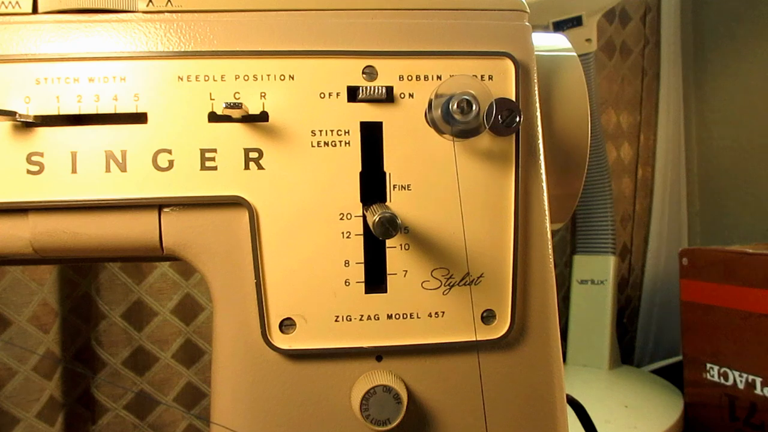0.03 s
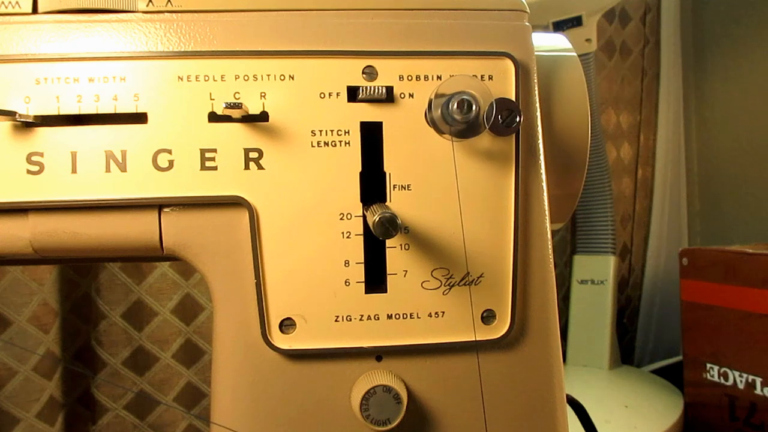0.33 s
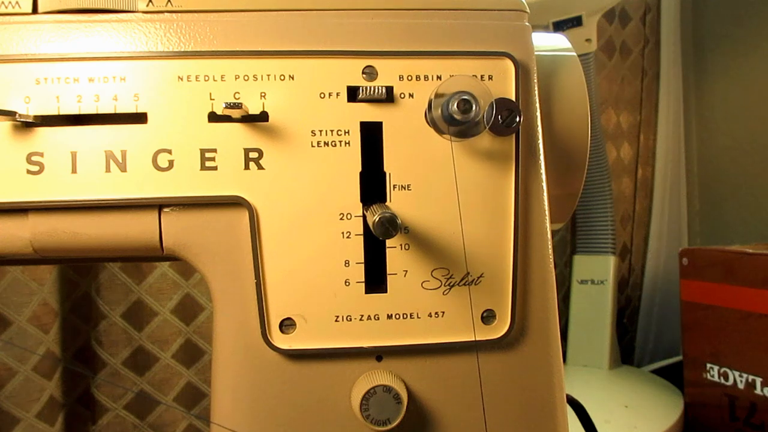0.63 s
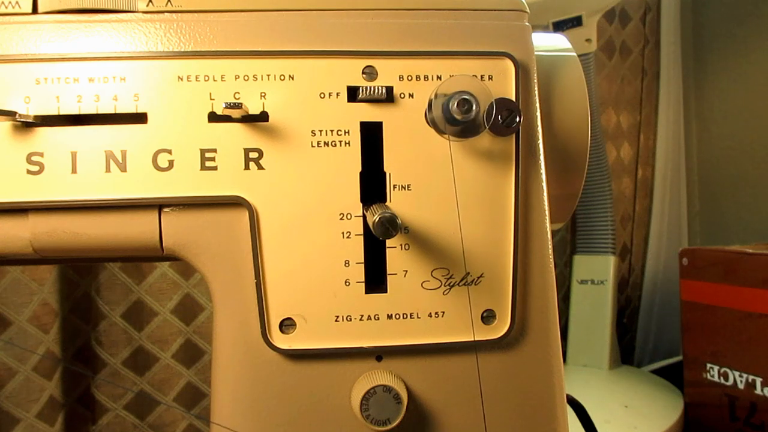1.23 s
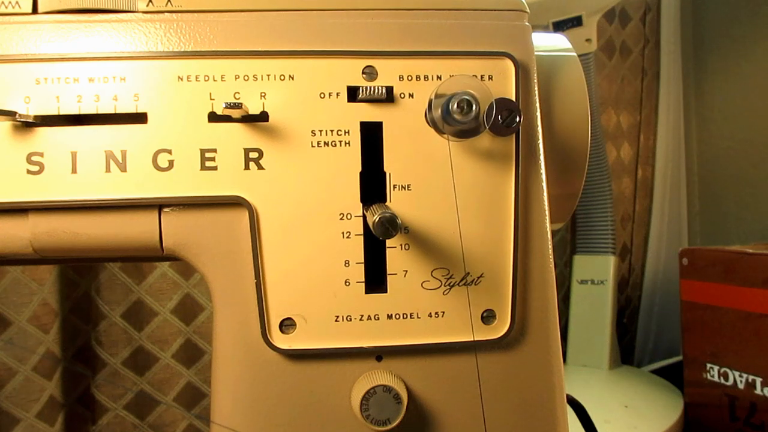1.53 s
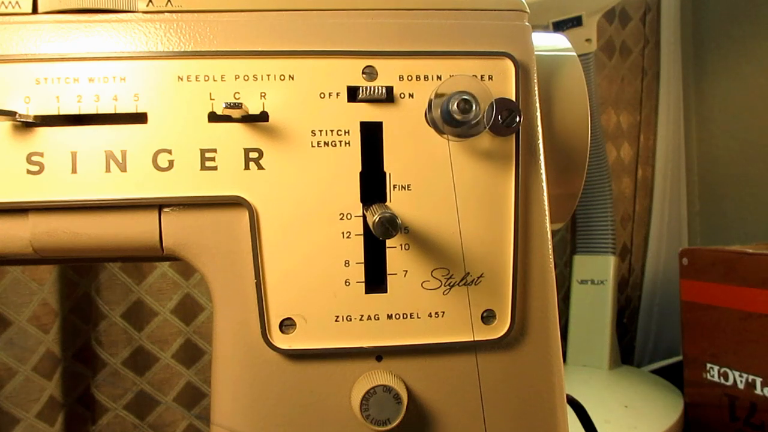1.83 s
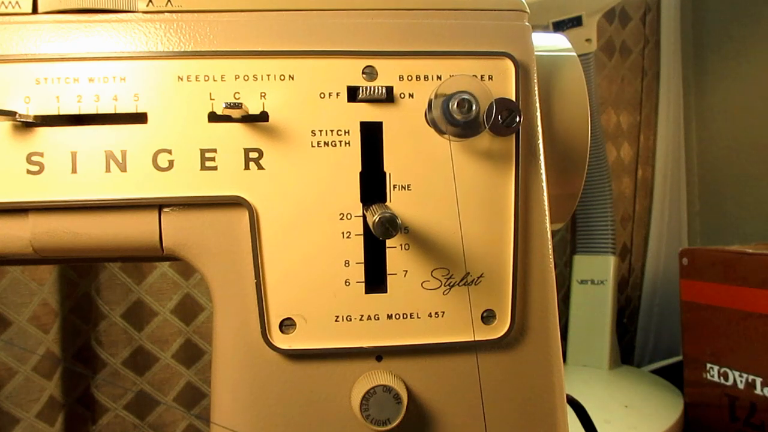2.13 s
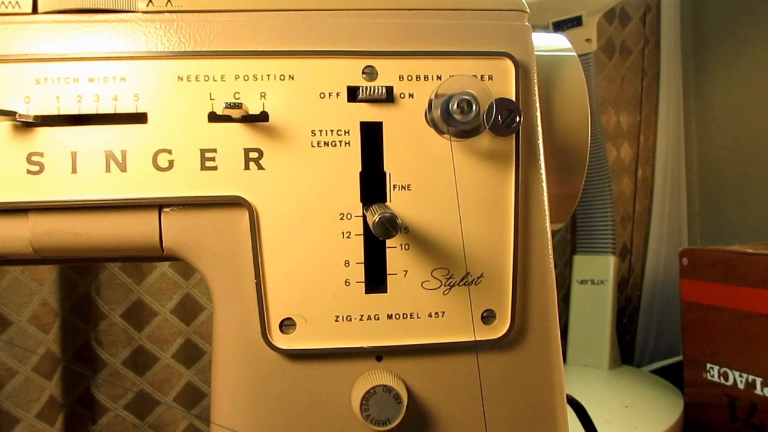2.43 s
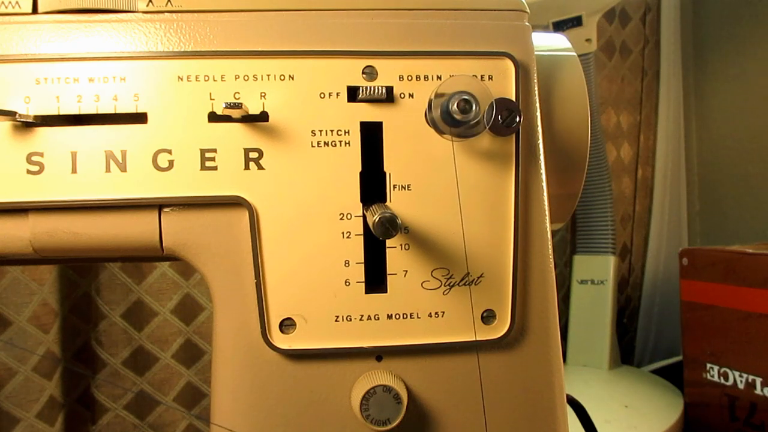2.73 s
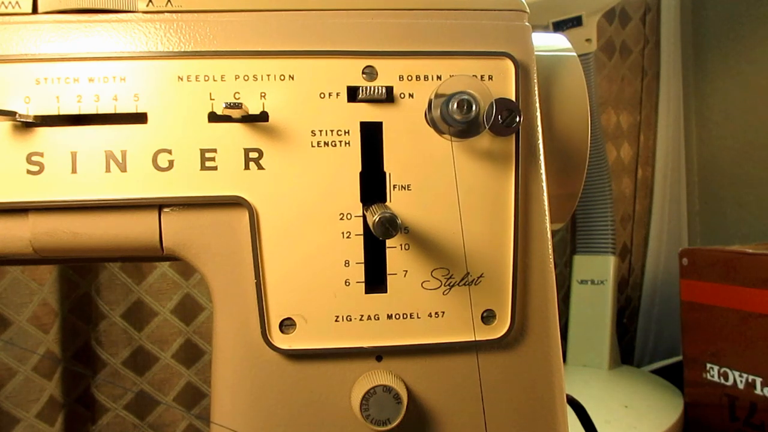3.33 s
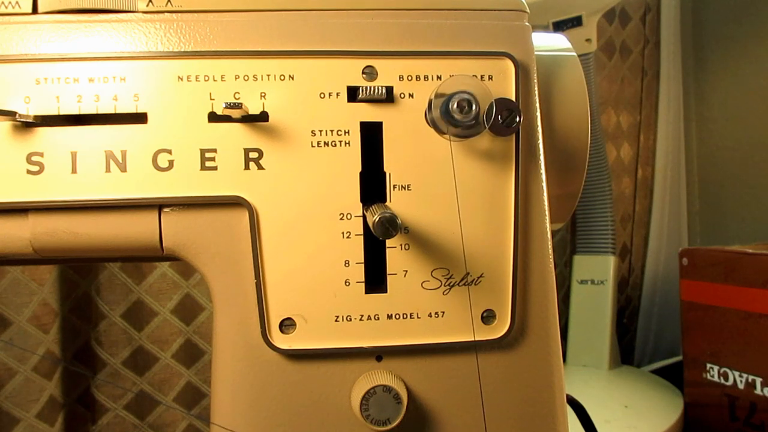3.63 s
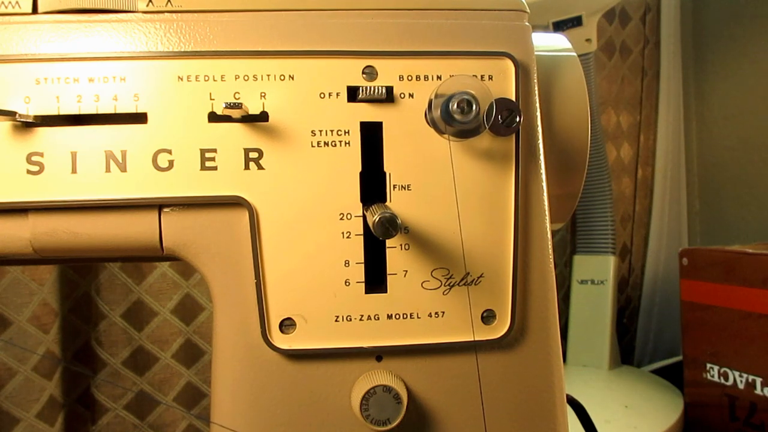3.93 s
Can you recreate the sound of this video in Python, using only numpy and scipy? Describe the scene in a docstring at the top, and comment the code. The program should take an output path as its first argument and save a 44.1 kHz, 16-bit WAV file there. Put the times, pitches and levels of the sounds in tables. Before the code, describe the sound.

A sewing machine winds a bobbin close by in a quiet room. Its motor whirs with a high buzz, a clear, slightly rising tone and rapid light knocks. One sharp snap comes near the middle as it runs on.

```python
"""A sewing machine winds a bobbin in a quiet room, slowly gaining speed.
Its motor brushes ring on the commutator and the winder sings one clear tone on top.
The belt drive knocks about eight times a second over a bed of motor whine, casing hum and
bearing and fan whir. One sharp snap makes the gain control duck, then ease back up."""
import sys
import numpy as np
from scipy import signal
from scipy.fft import rfft, irfft
from scipy.io import wavfile

SR = 44100
rng = np.random.default_rng(int(sys.argv[2]) if len(sys.argv) > 2 else 0)


def unload_audio(sound):
    """Save the sound as a 16-bit wav file, at the path given as the first command line argument."""
    columns = np.transpose(np.atleast_2d(sound))
    # keep every value between -1 and 1, then stretch to whole-number steps
    steps = np.round(np.clip(columns, -1, 1) * 32767)
    wavfile.write(sys.argv[1], SR, steps.astype(np.int16))


N = 176400
T = np.arange(N) / SR

# Motor run-up: (time [s], shaft speed [turns/s])
SHAFT_SPEED = [(0, 36.3), (.5, 36.8), (1, 37.5), (1.5, 38), (2.1, 38.4), (2.7, 38.55), (3.05, 38.85),
               (3.5, 39.05), (4, 39.4)]
# Peaks and notches of the casing: (frequency [Hz], width [Hz], boost [dB])
CASING_EQ = [(397.4, 13.3, 6.5), (859, 24, -18), (935, 54, 5.5), (1090, 36, 2), (1242, 33, 4),
             (1306, 60, -8), (1370, 24, 6), (1572, 23, 6.5), (1926, 114, 7.5), (2170, 75, -2),
             (2577, 190, 4), (2922, 60, 6.5), (3860, 51, 5.5), (4283, 180, 5.5), (5200, 37, -4),
             (5740, 160, -12), (7920, 54, -6), (8180, 70, -15)]
# Mains hum and two casing drones: (frequency [Hz], half-width [Hz], level [dB])
DRONES = [(120.4, 2.6, -50.5), (134.3, 6.7, -46.5), (781.7, 6, -44)]
# Tone colour of the bearings and fan: (frequency [Hz], relative level [dB])
WHIR_SPECTRUM = [(20, -31), (38, -26), (70, -16), (100, -17), (170, -13.5), (235, 2.5), (330, -2),
                 (460, -2), (700, -6), (1400, -10), (2300, -14), (3500, -11.5), (4500, -11.5), (5300, -6),
                 (6900, -14), (9400, -14.5), (10400, -21.5)]
# Motor whine: (pitch [multiple of shaft speed], mid-run level [dB], swell [dB/s])
MOTOR_PARTIALS = [(1, -69, 1), (7.924, -45, 2.5), (20.25, -48, 2), (21.86, -42.5, -2.5), (43.54, -52, 1.5),
                  (55.35, -49, 1.5), (75.4, -52, -3)]
# Ring of the snapping part: (frequency [Hz], relative level [dB], 60 dB decay time [s])
SNAP_RING = [(1690, -10, 0.012), (1970, -8, 0.014), (2750, -5.5, 0.0089), (3340, -10, 0.0064),
             (4200, -14.5, 0.0076), (6420, -16, .007)]
# Belt rhythm: (time [s], accent [dB], thud relative to the accent [dB])
BELT_KNOCKS = [(0.129, -18.5, -7.5), (0.267, -20.5, -12.5), (0.401, -23, -1.5), (0.537, -27.5, -0.5),
               (0.672, -22.5, -11), (0.808, -21, -3), (0.866, -19.5, -13), (1.023, -16, -9.5),
               (1.076, -15.5, -11.5), (1.208, -18, -10), (1.288, -23, -27), (1.34, -15, -18),
               (1.472, -18.5, -7.5), (1.603, -19, -7), (1.864, -21.5, -5.5), (1.924, -15.5, -13),
               (2.074, -19, -10), (2.127, -14.5, -11.5), (2.256, -16.5, -7), (2.387, -17, -10),
               (2.516, -16.5, -9), (2.646, -17, -12), (2.723, -20.5, -6), (2.775, -26, -22),
               (2.823, -19, -12), (2.903, -17, -6), (2.961, -14.5, -11), (3.11, -21, -15),
               (3.163, -15, -12), (3.29, -15.5, -11), (3.419, -18, -9), (3.496, -20, -11),
               (3.544, -15.5, -11), (3.674, -22, -7), (3.751, -23.5, -21), (3.799, -22, -10),
               (3.849, -18, -14), (3.927, -17.5, -8.5), (3.986, -16, -13)]
# Rise of the winder's tone: (time [s], pitch [Hz], level [dB])
WINDER_GLIDE = [(0, 520, -35), (.3, 524, -33), (.6, 525, -32.5), (1.1, 534, -33.5), (1.7, 539, -32),
                (2.1, 541, -30.5), (2.8, 544.5, -28.5), (3.25, 549.5, -29), (3.5, 548.6, -29),
                (4, 554, -28.5)]
# Brush pressure around the shaft: (rate [cycles/turn], depth [fraction of the mean])
BRUSH_PRESSURE = [(2, 0.16), (3, 0.074), (4, 0.51)]
# Ring of the brush holder: (frequency [Hz], nominal width [Hz], relative level [dB])
HOLDER_MODES = [(4325, 200, -22), (4756, 90, -13.5), (5156, 50, -7.5), (5334, 88, -0.5), (5416, 150, -4),
                (5580, 83, -0.5), (5890, 96, -11.5), (6057, 114, -5), (6153, 63, -4), (6260, 154, -7.5),
                (6550, 180, -22), (7736, 93, -12.5), (8226, 184, -10.5)]
# Swell of the brushes: (time [s], level [dB])
BRUSH_SWELL = [(0, -32), (.4, -31), (.9, -31), (1.45, -29.5), (2, -29.5), (2.6, -28.5), (3.2, -27),
               (4, -27.5)]


def from_db(db):
    """Decibels to gain."""
    return 10 ** (np.asarray(db) / 20)


def unit_rms(x):
    """Scale to unit power."""
    return x / np.sqrt(np.mean(x ** 2) + 1e-20)


def automation(rows):
    """One curve for each column after the time, drawn through every sample."""
    times, *columns = np.transpose(rows)
    return [np.interp(T, times, column) for column in columns]


def noise(gain_at):
    """Unit-power noise coloured by a gain for each frequency."""
    hz = np.maximum(np.fft.rfftfreq(N, 1 / SR), 1e-3)
    return unit_rms(irfft(rfft(rng.standard_normal(N)) * gain_at(hz), N))


def drift(rate_hz):
    """Random modulation of unit power, mostly slower than rate_hz."""
    return noise(lambda hz: 1 / (1 + (hz / rate_hz) ** 2))


def band(x, edges_hz):
    """Gentle band-pass."""
    return signal.sosfilt(signal.butter(2, edges_hz, "band", fs=SR, output="sos"), x)


def resonate(x, hz, width_hz):
    """One resonance with unity gain at its peak."""
    r = np.exp(-np.pi * width_hz / SR)
    feedback = [1, -2 * r * np.cos(2 * np.pi * hz / SR), r * r]
    return signal.lfilter(np.array([1, 0, -1]) * (1 - r * r) / 2, feedback, x + 1e-18)


def clicks(times, sizes):
    """Impulses placed between samples."""
    out, position = np.zeros(N), np.clip(times * SR, 0, N - 2)
    i = position.astype(int)
    np.add.at(out, i, sizes * (1 - position + i))
    np.add.at(out, i + 1, sizes * (position - i))
    return out


def burst(times, db, t60_s, edges_hz):
    """A dense rattle that hits at each time and dies away."""
    decay = from_db(-60 / (t60_s * SR))
    envelope = signal.lfilter([1], [1, -decay], clicks(times, from_db(db)) + 1e-18)
    return envelope * unit_rms(band(rng.standard_normal(N), edges_hz))


def room(x, wet_db=-16.5, t60_s=0.14):
    """A faint, short room tail, different on each side."""
    t = T[:SR // 2]
    tail = rng.standard_normal((2, len(t))) * from_db(-60 * t / t60_s)
    tail /= np.sqrt(np.sum(tail ** 2, axis=1, keepdims=True))
    return from_db(wet_db) * signal.fftconvolve(x[None], tail, axes=1)[:, :N]


def casing(x):
    """The machine's body lifts and scoops narrow bands."""
    for hz, width, boost_db in CASING_EQ:
        x = x + (from_db(boost_db) - 1) * resonate(x, hz, width)
    return x


def hum():
    """Mains hum and casing drones: narrow noise bands that hold their pitch as the motor climbs."""
    return sum(from_db(db) * noise(lambda hz: 1 / (1 + ((hz - centre) / half_width) ** 2))
               for centre, half_width, db in DRONES)


def whir(turns, level_db=-30, side_db=-18.5, throb=0.16, wide_below_hz=70):
    """Bearing and fan noise throbs with the shaft; slightly wide, more so in the bass."""
    points_hz, points_db = np.transpose(WHIR_SPECTRUM)

    def colour(hz):
        return from_db(np.interp(np.log(hz), np.log(points_hz), points_db))

    mid = noise(colour) * (1 + throb * np.sin(2 * np.pi * turns))
    side = noise(lambda hz: colour(hz) * (1 + 1 / (1 + (hz / wide_below_hz) ** 2)))
    return from_db(level_db) * (mid + from_db(side_db) * side * [[1], [-1]])


def motor_whine(turns, flutter_db=1.4, wander_rad=0.16):
    """Wavering tones locked to the shaft; some swell and some fade over the run."""
    whine = np.zeros(N)
    for multiple, db, swell in MOTOR_PARTIALS:
        gain = from_db(db + swell * (T - T.mean()) + flutter_db * drift(4.5))
        phase = 2 * np.pi * multiple * turns + wander_rad * drift(10)
        whine += np.sqrt(2) * gain * np.sin(phase)
    return whine


def snap(crack_at_s=1.7633, contact_at_s=1.7645, low_cut_hz=1400):
    """A snap at the winder: a gritty crack, then a hard contact rings a small, well-damped part."""
    start = np.array([crack_at_s])
    crack = burst(start, db=-12, t60_s=0.013, edges_hz=(1600, 4300))
    grit = burst(start, db=-20, t60_s=0.013, edges_hz=(6000, 8550))
    contact = clicks(np.array([contact_at_s]), 0.95) + 1e-18
    ring = np.zeros(N)
    for k, (hz, db, t60_s) in enumerate(SNAP_RING):
        r, w = from_db(-60 / (t60_s * SR)), 2 * np.pi * hz / SR
        mode = signal.lfilter([0, np.sin(w)], [1, -2 * r * np.cos(w), r * r], contact)
        ring += (-1) ** k * from_db(db) * mode
    low_cut = signal.butter(6, low_cut_hz, "high", fs=SR, output="sos")
    return signal.sosfilt(low_cut, crack + grit + ring)


def belt(rebound_s=0.007, rebound_db=-10, attack_hz=(1100, 4170)):
    """Each belt knock is a hard tick and a short crack with a softer rebound, over a longer thud."""
    times, accent_db, thud_db = np.transpose(BELT_KNOCKS)
    rebounds = times + rebound_s * rng.uniform(0.7, 1.3, len(times))
    ticks = band(clicks(times, from_db(accent_db + 5.5)), attack_hz)
    crack_db = np.r_[accent_db, accent_db + rebound_db] - 7
    cracks = burst(np.r_[times, rebounds], crack_db, t60_s=0.028, edges_hz=attack_hz)
    thuds = burst(times, accent_db + thud_db - 0.5, t60_s=0.079, edges_hz=(600, 1390))
    return ticks + cracks + thuds


def winder(wow_hz=0.82, flutter_db=0.48):
    """The bobbin winder sings one clear, rising tone with a light flutter."""
    hz, db = automation(WINDER_GLIDE)
    phase = 2 * np.pi * np.cumsum(hz + wow_hz * drift(8.7)) / SR
    return np.sqrt(2) * from_db(db + flutter_db * drift(45)) * np.sin(phase)


def brushes(turns, bars=11, sway_s=2.2e-5, uneven_s=2e-5, jitter_s=1.5e-5, friction=0.49):
    """Slightly uneven commutator bars tick and rub under the swaying brushes and ring their holder."""
    passes = np.arange(int(turns[-1] * bars))
    bar_offsets = uneven_s * unit_rms(rng.standard_normal(bars))
    times = np.interp(passes / bars, turns, T + sway_s * drift(23))
    times += bar_offsets[passes % bars]  # the same limp on every turn
    times += jitter_s * rng.standard_normal(N)[passes]
    bite_hz = (4000, 9000)
    ticks = unit_rms(band(clicks(times, 1), bite_hz))
    bar_pulse = 1 + np.cos(2 * np.pi * bars * turns)
    rub = unit_rms(band(rng.standard_normal(N) * bar_pulse, bite_hz))
    pressure = 1 + sum(depth * np.cos(2 * np.pi * rate * turns) for rate, depth in BRUSH_PRESSURE)
    force = pressure * (ticks + friction * rub)
    ring = np.zeros(N)
    for k, (hz, width, db) in enumerate(HOLDER_MODES):
        # Two broader resonances in series steepen the skirts.
        mode = resonate(resonate(force, hz, 1.5 * width), hz, 1.5 * width)
        ring += (-1) ** k * from_db(db) * mode
    level_db, = automation(BRUSH_SWELL)
    return from_db(level_db) * unit_rms(casing(ring))


def scene(speed_wobble=0.00119):
    """The whole machine, close and almost centred; one shaft drives brushes, whine and throb."""
    speed_hz, = automation(SHAFT_SPEED)
    turns = np.cumsum(speed_hz * (1 + speed_wobble * drift(7.47))) / SR
    mechanism = brushes(turns) + motor_whine(turns) + hum() + casing(belt()) + snap()
    pan = from_db([[-0.2], [0.2]])
    return (mechanism + room(mechanism) + casing(whir(turns))) * pan + winder()


def record(dry, threshold_db=-5.5, duck_per_db=0.57, release_db_per_s=4, attack_s=0.011):
    """Gain control ducks after a peak and recovers slowly; a steep high cut takes off the air."""
    peak_db = 20 * np.log10(np.abs(dry).max(axis=0) + 1e-9)
    duck_db = np.maximum(peak_db - threshold_db, 0) * duck_per_db
    held_db = np.maximum.accumulate(duck_db + release_db_per_s * T) - release_db_per_s * T
    r = np.exp(-1 / (attack_s * SR))
    smooth_db = signal.lfilter([1 - r], [1, -r], held_db)
    high_cut = signal.ellip(16, 0.1, 120, 10550, fs=SR, output="sos")
    return signal.sosfilt(high_cut, dry * from_db(-smooth_db))


dry = scene()
out = record(dry)
unload_audio(out)
```